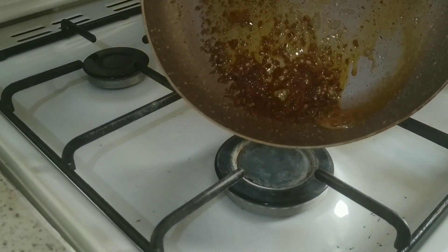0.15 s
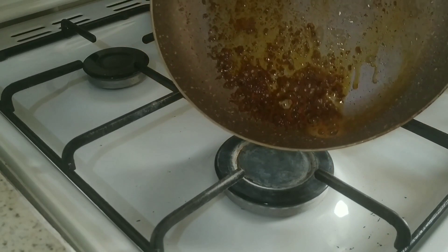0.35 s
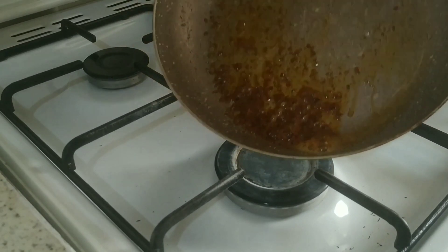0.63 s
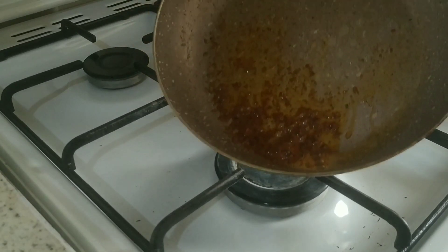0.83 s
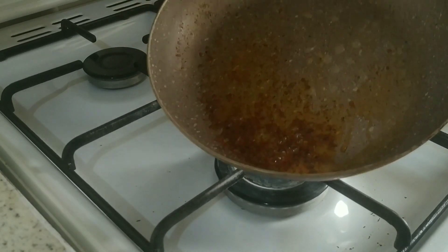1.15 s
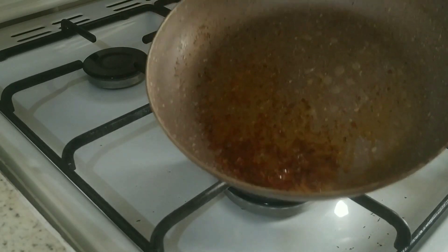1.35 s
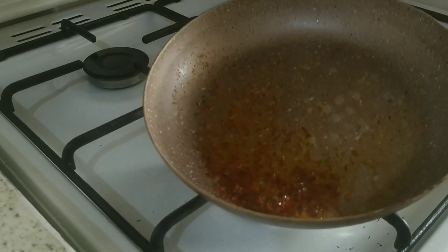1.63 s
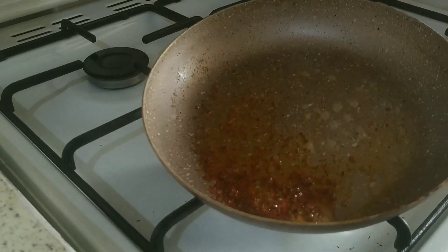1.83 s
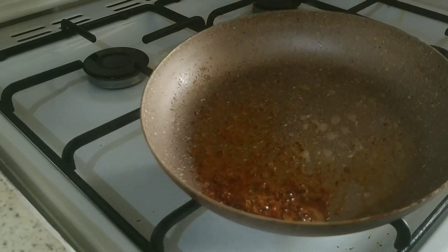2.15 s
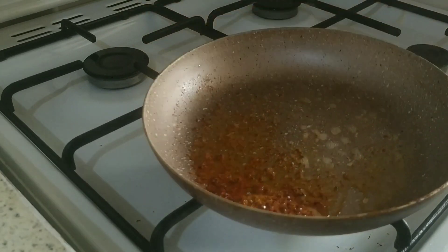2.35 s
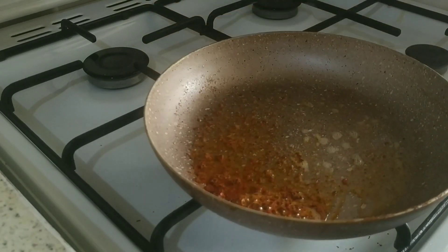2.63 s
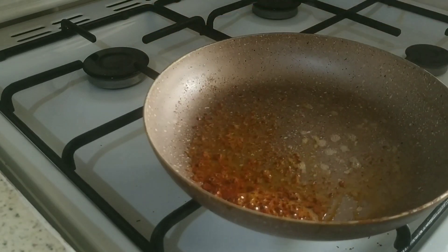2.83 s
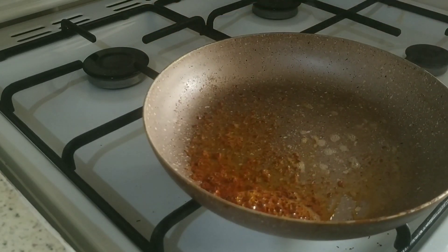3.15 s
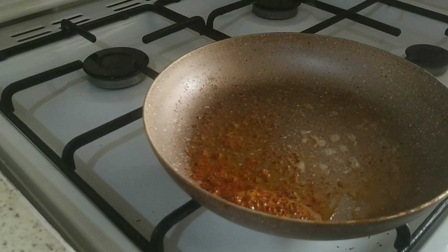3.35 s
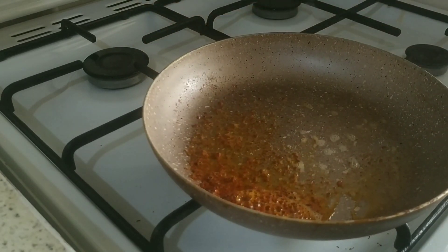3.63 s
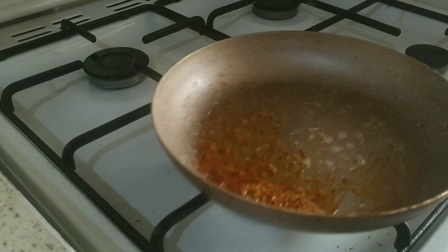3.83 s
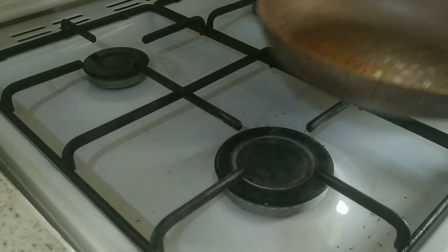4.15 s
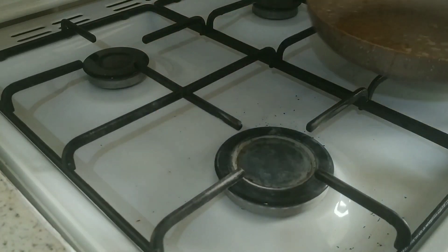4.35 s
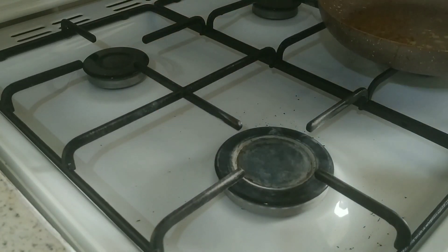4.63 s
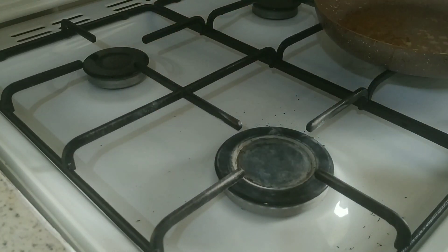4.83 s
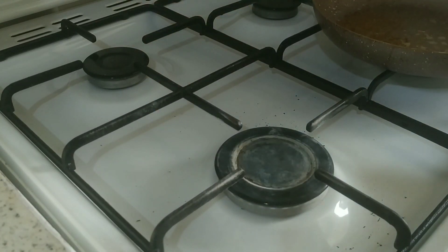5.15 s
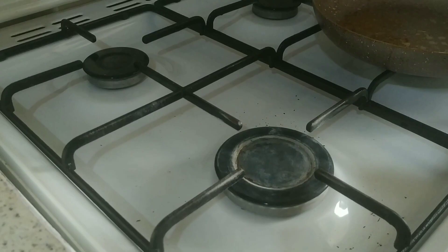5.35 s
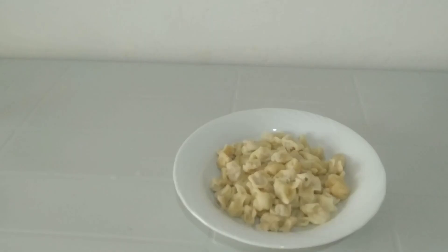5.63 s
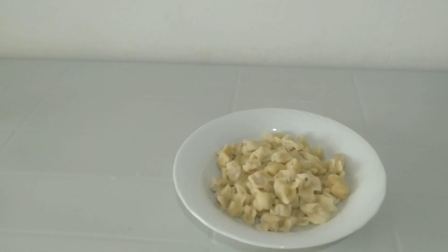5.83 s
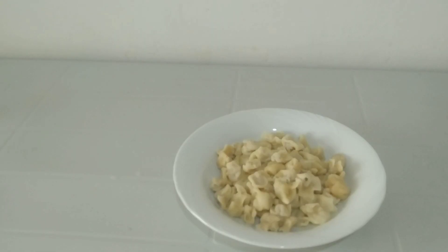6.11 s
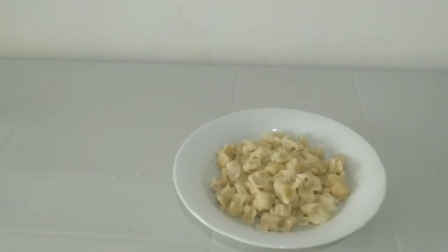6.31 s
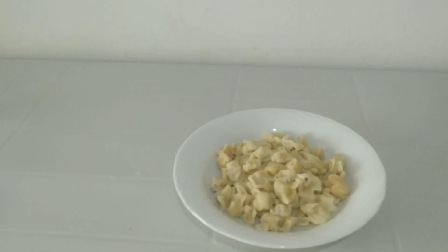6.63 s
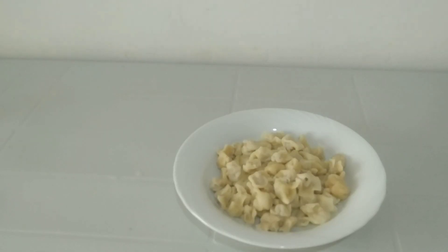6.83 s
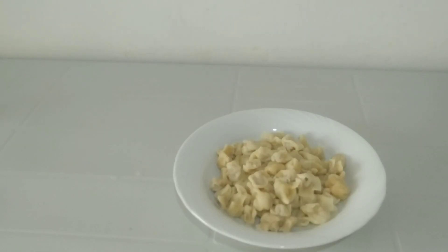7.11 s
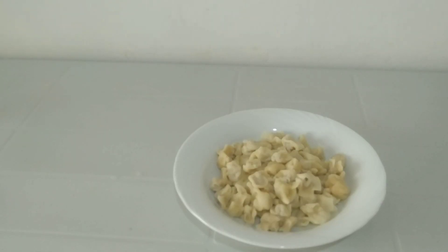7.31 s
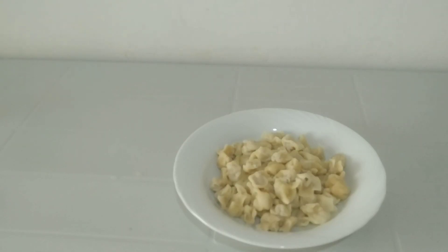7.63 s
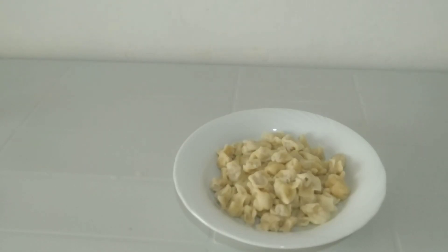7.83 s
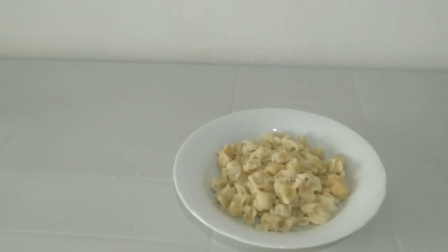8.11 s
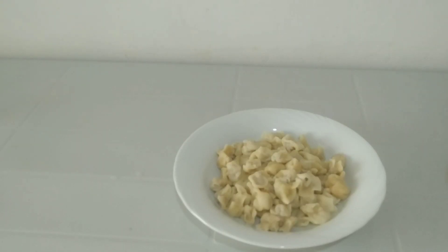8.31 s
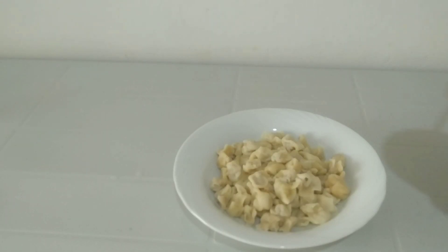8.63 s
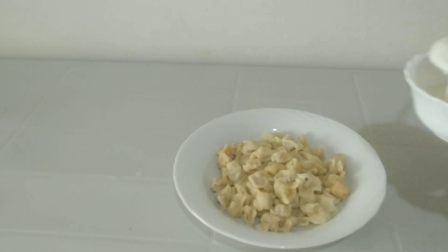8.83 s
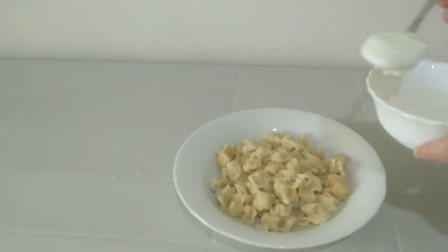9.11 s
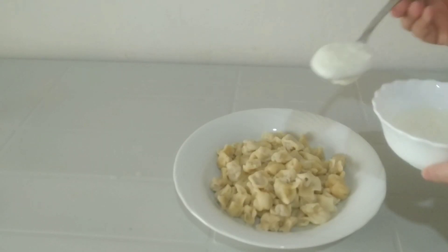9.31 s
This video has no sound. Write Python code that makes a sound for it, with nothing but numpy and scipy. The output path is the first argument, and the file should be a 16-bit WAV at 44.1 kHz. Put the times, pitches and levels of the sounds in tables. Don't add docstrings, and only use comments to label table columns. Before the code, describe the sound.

Close stereo sound of a pan on a stove: quiet high sizzle, tiny crackles, steady hum and rumble, then short metallic knocks with low panel booms and a brief room tail. The sizzle weakens as the pan is moved away. A brief cut leads to a different, soft humming room tone at a table, where a spoon makes several small, bright, quickly dying clinks on a bowl, left of centre.

```python
import sys
import numpy as np
from scipy import signal
from scipy.fft import rfft, irfft
from scipy.io import wavfile
from scipy.ndimage import uniform_filter1d

SR = 44100
rng = np.random.default_rng(int(sys.argv[2]) if len(sys.argv) > 2 else 0)


def wav_out(sig):
    wavfile.write(sys.argv[1], SR, np.round(np.clip(np.atleast_2d(sig).T, -1, 1) * 32767).astype(np.int16))


def gain_from_decibels(decibels):
    exponent = np.asarray(decibels, float) / 20
    return 10 ** exponent


N = 417627
STOVE_END_S, TABLE_START_S = 5.562, 5.594

HUM_HZ = [49.13, 98.26, 100, 156.7, 172.6, 185.1, 191.4, 198.4, 227.3, 294.8, 339.1, 400.7, 465.2, 482.2,
          538.9, 638.8, 3063]
STOVE_HUM_DB = [-60.5, -83.5, -44.5, -85.5, -70, -82, -66.5, -71.5, -67, -77.5, -75.5, -84, -71, -94, -93.5,
                -89, -85]
TABLE_HUM_DB = [-74, -52.5, -50.5, -72, -111, -61, -106, -62.5, -88, -70, -60.5, -70, -99, -68.5, -67,
                -75.5, -79]
# frequency in Hz, density in dB per Hz.
STOVE_AIR = [(12, -21), (30, -15.5), (60, -10), (110, -12), (154, -17.5), (328, -20), (388, -25),
             (472, -26), (590, -26.5), (1480, -36.5), (3630, -40.5), (10500, -42), (14700, -52.5),
             (16000, -66)]
TABLE_AIR = [(12, -42), (30, -7.5), (70, -9.5), (146, -14.5), (255, -14.5), (434, -19), (542, -19),
             (1090, -28), (2000, -33), (3300, -32), (5000, -34.5), (10500, -35.5), (14700, -38.5),
             (16000, -48)]
FIZZ = [(1180, -41), (2000, -12), (3010, -11), (3260, -6), (3770, -2.5), (8480, 2), (14900, -1.5),
        (16000, 1)]
# centre in Hz, width in Hz, level over the rumble in dB.
STOVE_BANDS = [(50, 2.3, 5.5), (65, 2.1, -5), (76, 9, 10), (100, 4.4, 7.5), (119.9, 2.6, 14), (354, 5.8, 3),
               (517, 9.6, 8.5)]
TABLE_BANDS = [(63.5, 10.4, 8.6), (81, 6.1, 3.9), (115, 10, 5.1), (192, 6.5, 0.54), (338.4, 19, 6.9),
               (528, 15, 1.9)]
# frequency in Hz, left-right likeness from -1 to 1.
LIKENESS = [(60, 0.88), (180, 0.86), (550, 0.55), (1650, -0.19), (4970, 0.14), (15000, -0.043)]
# frequency in Hz, t60 in s.
KITCHEN_T60 = [(125, .35), (500, 0.35), (1400, 0.25), (5000, 0.24), (12000, 0.16)]
# start in s, peak level in dB, centre in Hz.
SPITS = [(1.3534, -42, 9030), (1.45, -34, 11200), (2.178, -42, 5010), (2.5022, -42, 9780),
         (2.5214, -32.5, 12000), (3.3988, -42.5, 8960), (5.7868, -45.5, 8100)]
# start in s, level in dB.
THUMPS = [(1.756, -35), (2.775, -28.5), (3.908, -38), (4.764, -33.5), (5.007, -49.5), (5.112, -34.5)]
# frequency in Hz, level in dB, t60 in s.
PANELS = [(80, 1, 0.25), (124, 7.5, 0.35), (179.2, 4, 0.27), (222.1, 0, 0.38), (275.6, -5.5, 0.28),
          (344, -8, 0.49), (425.5, -10, 0.2), (485, -12, 0.29), (520, -12.5, 0.81), (624, -23, 0.063),
          (675, -13.5, 0.08)]
SETTLING = [(538, 1.5, 0.26), (700, -14, .1)]
# start in s, crack at 1.5 kHz in dB, 3.5 kHz relative level in dB, ring relative level
# in dB, contact time in ms.
CLINKS = [
    (7.2408, -43, 13, 23.5, 0.11),
    (7.5386, -34.5, 0, 0, 0.25),
    (7.8374, -51.5, 8, 11, 0.15),
    (8.176, -89, 6, 36, 0.9),
]
# frequency in Hz, level in dB, t60 in s.
BOWL = [(1395, -22.5, 0.23), (2100, -23, 0.048), (3040, -20.5, 0.16), (2530, -26.5, 0.097),
        (3460, -13.5, 0.21), (3480, -13, 0.27), (5530, -16.5, .08), (6214, -7, 0.11), (6210, -2, 0.1),
        (7000, -10, 0.064), (7430, -16, 0.15), (9340, -5.5, 0.039), (12370, -4.5, 0.035),
        (14800, -5, 0.022)]
DAMPED_SPOT = [(3500, -9, 0.25), (4200, -21, 0.049), (4560, -29, 3.2), (4560, -21, 0.32), (5082, -19, 0.17),
               (5970, -3, 0.054), (6360, -35, 0.65), (6600, -51, 5.0), (6900, -28, 0.14),
               (7450, 1.5, 0.034), (8200, -24, 0.096), (8780, -9, 0.096)]
LIGHT_CLINK = [(1470, -8, 0.047), (2330, 1, 0.033), (3590, 0.5, 0.08), (3650, -3, 0.14), (6250, -8, 0.14),
               (6270, -6.5, 0.19), (9590, -14, .05), (12860, -12, .03)]
# start in s, crack at 1.5 kHz in dB, 3.5 kHz relative level in dB, ring relative level
# in dB, contact time in ms.
KNOCKS = [
    (1.748, -36, -27, -8.5, 0.85),
    (2.449, -31.5, -12, -5.5, 1.4),
    (2.7707, -15, -5, -6.5, 0.15),
    (3.782, -43, -10, 12, 2.2),
    (3.9045, -24.5, -6, -3, 0.22),
    (4.7585, -35, -36, 2, 0.61),
    (5.1105, -24.5, -10, -3, 1.4),
    (4.750, -38, -4, 0, 1.1),
    (5.1035, -27.5, 3, -8.5, 0.98),
]
KNOCK_LAGS = [1, -2, 5, -4, -5, -4, -3, -4, -3]
# frequency in Hz, level in dB, t60 in s.
BELLY = [(542, -5.5, 0.91), (750, -5, 0.23), (862, -3, 0.48), (1056, -4, 0.11), (1260, -12, 0.24),
         (1530, -2.5, 0.1), (1860, -4, 0.1), (2060, -6, 0.12), (2550, -6.5, 0.045), (4520, -18, 0.076)]
EDGE = [(800, -3, 0.091), (783, -3, 0.17), (1020, -7, 0.054), (1350, -10.5, 0.17), (1553, -11, 0.14),
        (2180, -7.5, 0.088), (2570, -10.5, 0.071), (2957, -10.5, 0.15), (3220, -16.5, 0.11),
        (4000, -17, .1)]
FLAT = [(534, -31, 1), (600, -14, 0.05), (640, -10.5, 0.13), (780, -18, 0.13), (793, 2.5, 0.088),
        (880, 6, 0.12), (1100, 0.5, 0.12), (1190, 6, 0.044), (1363, 10, 0.044), (1430, -15, .08),
        (2197, 2, 0.085), (2460, -9.5, 0.3), (3180, 5.5, 0.07), (3300, -15, 0.18)]
PRONG = [(1140, 5, 0.028), (1280, -29, 0.1), (1900, -37.5, 0.28), (2100, -21, 0.044)]
TILT = [(553, -15, 0.17), (770, -3.5, 0.037), (918, 1, 0.03), (1022, -6, 0.1), (1154, 0, 0.038),
        (1390, -7.5, 0.055), (1650, -11, 0.051), (2060, -17, 0.19), (2900, -25, 0.11), (3370, -23, 0.063),
        (3650, -25, 0.073), (4550, -11, 0.038)]
BACK_TILT = [(516, -8, 0.1), (690, -11, .15), (794, 0, .1), (877, -1.5, 0.099), (1190, -17, .15),
             (1383, -2, 0.14), (2060, -9.5, 0.19), (2440, -22, 0.22), (2993, -6.5, 0.11),
             (4560, -16, 0.068)]
BACK_FLAT = [(440, -9.5, 0.14), (548, -13, 0.26), (666, -5, 0.1), (780, -1.5, 0.21), (967, -6, 0.16),
             (1066, -12, 0.19), (1185, -8.5, 0.24), (1383, 2, 0.18), (1554, -17.5, 0.34),
             (2084, -10.5, 0.31), (2590, -14, 0.22), (2960, -6.5, 0.22), (3710, -20, 0.072),
             (4540, -9.5, 0.11)]


def evened(x):
    return x / np.sqrt(np.mean(x ** 2) + 1e-20)


def read(points, hz):
    f, value = np.transpose(points)
    return np.interp(np.log(hz + 1), np.log(f + 1), value)


def add(mix, s, sound):
    part = mix[round(s * SR):][:len(sound)]
    part += sound[:len(part)]


def second_microphone(first, other, likeness):
    return np.array([first, likeness * first + np.sqrt(1 - likeness ** 2) * other])


def hum(levels_db, right_db):
    beat_peak_s = 6.347
    t = np.arange(N) / SR - beat_peak_s
    lines = np.zeros(N)
    for k, (hz, db) in enumerate(zip(HUM_HZ, levels_db)):
        start, sway_hz, sway_start = rng.random(3) * (k > 2)
        sway = 1 + 0.48 * np.sin(2 * np.pi * (2.5 * sway_hz * t + sway_start))
        lines += np.sqrt(2) * gain_from_decibels(db) * sway * np.cos(2 * np.pi * (hz * t + start))
    return lines * gain_from_decibels(np.array([[-right_db], [right_db]]))


def air(spectrum, bands, patchy_db, size):
    hop = size // 4
    hz = np.fft.rfftfreq(size, 1 / SR)
    a, b, c, d, patches = rng.standard_normal((N // hop + 5, len(hz), 5)).T
    patches = uniform_filter1d(patches, size=9, axis=0)
    patches = evened(uniform_filter1d(patches, size=6, axis=1))
    likeness = np.clip(read(LIKENESS, hz), -1, 1)[:, None]
    z = second_microphone(a + 1j * b, c + 1j * d, likeness)
    shape_db = read(spectrum, hz)
    for centre_hz, width_hz, db in bands:
        shape_db = shape_db + db * np.exp(-((hz - centre_hz) / width_hz) ** 2)
    z *= gain_from_decibels(shape_db[:, None] + patchy_db * patches)
    return evened(signal.istft(z, nperseg=size, noverlap=size - hop)[1][:, :N])


def stove_background():
    lines = hum(STOVE_HUM_DB, right_db=0.62)
    return lines + gain_from_decibels(-50.5) * air(STOVE_AIR, STOVE_BANDS, patchy_db=2.77, size=8192)


def table_background(t):
    wake_db, awake_db, wake_s = -20.5, -5.5, 0.098
    lines = hum(TABLE_HUM_DB, right_db=0.0)
    rumble = gain_from_decibels(-49.5) * air(TABLE_AIR, TABLE_BANDS, patchy_db=3.0, size=8192)
    gain_db = awake_db + (wake_db - awake_db) * np.exp(-abs(t - TABLE_START_S) / wake_s)
    return gain_from_decibels(gain_db) * (lines + rumble)


def kitchen(x, gap_ms):
    taps = np.zeros((2, SR // 2))
    at = np.arange(0, SR // 2 - 20, 20)
    at = at + rng.integers(0, 20, (2, len(at)))
    np.put_along_axis(taps, at, rng.choice([-1., 1.], at.shape), 1)
    hz, t, z = signal.stft(taps, SR, nperseg=256)
    likeness = np.clip(read(LIKENESS, hz), 0, 1)[:, None]
    z = second_microphone(z[0], z[1], likeness)
    fall = gain_from_decibels(-60 * t / read(KITCHEN_T60, hz)[:, None])
    tail = signal.istft(z * fall, SR, nperseg=256)[1]
    tail *= np.minimum(np.arange(tail.shape[1]) * 1000 / (SR * gap_ms), 1)
    return signal.fftconvolve(x[None], tail / np.linalg.norm(tail[0]), axes=1)[:, :N]


def oil_fizz(t):
    hot_db, cool_db, cool_s = -59, -66, 1.26
    away_s, away_db, away_db_per_s = 4.4, -4.5, 1.5
    level_db = cool_db + (hot_db - cool_db) * np.exp(-t / cool_s)
    level_db += (t > away_s) * (away_db + away_db_per_s * (t - away_s))
    return gain_from_decibels(level_db + 3.0) * air(FIZZ, [], patchy_db=2.0, size=512)


def oil_spits():
    spits = np.zeros(N)
    t = np.arange(SR // 50) / SR
    for s, db, hz in SPITS:
        band = signal.butter(2, [0.72 * hz, min(2.0 * hz, 16000)], "bandpass", fs=SR, output="sos")
        puff = evened(signal.sosfilt(band, rng.standard_normal(len(t))))
        add(spits, s, gain_from_decibels(db) * puff * np.exp(-t * 1000 / 1.4))
    return spits


def ring(modes, contact_ms, damping=1.0, cycles=0.37):
    split, twin_db = 0.027, -7.5
    t = np.arange(SR // 2) / SR
    hz, db, t60 = np.transpose(modes)[:, :, None]
    swell = (1 - np.exp(-t / (contact_ms / 1000 + cycles / hz))) ** 2
    fall_db = 60 * t * damping / np.clip(t60, .02, .9)
    off, start = rng.random((len(hz), 2, 2)).T[..., None]
    upper = np.sin(2 * np.pi * (hz * (1 + split * off[0]) * t + start[0]))
    lower = np.sin(2 * np.pi * (hz * (1 - split * off[1]) * t + start[1]))
    tones = np.sin(2 * np.pi * hz * t) + gain_from_decibels(twin_db - 0.25 * fall_db) * (upper + lower)
    return (swell * gain_from_decibels(db - db.max() - fall_db) * tones).sum(0)


def hit(db, mid_db, high_db, ring_db, contact_ms, modes, crack_ms, low_hz, damping):
    t = np.arange(SR // 2) / SR
    top_db = high_db - 13.0 + 0.93 * min(high_db - mid_db, 0)
    colour = [(0.47 * low_hz, -30), (low_hz, -3), (1500, 0), (3500, mid_db),
              (6500, 0.89 * mid_db + 0.17 * high_db), (10500, high_db), (15500, top_db)]
    shape = gain_from_decibels(read(colour, np.fft.rfftfreq(len(t), 1 / SR)))
    noise = evened(irfft(rfft(rng.standard_normal(len(t))) * shape))
    noise *= gain_from_decibels(max(0, mid_db, high_db))
    rise = (1 - np.exp(-t * 1000 / contact_ms)) ** 2
    crack = noise * rise * np.exp(-t * 1000 / (crack_ms + contact_ms))
    return gain_from_decibels(db) * (crack + gain_from_decibels(ring_db) * ring(modes, contact_ms, damping))


def stove_top():
    boom = np.zeros(N)
    for s, db in THUMPS:
        add(boom, s, gain_from_decibels(db) * ring(PANELS, contact_ms=3.7, cycles=2.0))
    add(boom, 5.003, gain_from_decibels(-44.5) * ring(SETTLING, contact_ms=2.5))
    return boom


def bowl_clinks():
    bowl = np.zeros(N)
    for (s, db, mid_db, ring_db, ms), modes in zip(CLINKS, [BOWL, DAMPED_SPOT, LIGHT_CLINK, LIGHT_CLINK]):
        high_db = mid_db - 0.5
        add(bowl, s, hit(db, mid_db, high_db, ring_db, ms, modes, crack_ms=5.1, low_hz=1322, damping=2.66))
    return bowl


def bowl_at_left(bowl):
    direct = np.array([gain_from_decibels(2.5) * np.roll(bowl, shift=-21), gain_from_decibels(-7.0) * bowl])
    return direct + gain_from_decibels(np.array([[-2.5], [-6.5]])) * kitchen(bowl, gap_ms=4.2)


def pan_knocks():
    sharp_db, dull_db, dull_ms = 16.5, -12.5, 0.27
    direct, to_room = np.zeros((2, 2, N))
    struck = [BELLY, EDGE, FLAT, PRONG, TILT, BACK_TILT, BACK_FLAT, BACK_TILT, BACK_FLAT]
    for k, ((s, db, mid_db, ring_db, ms), modes, lag) in enumerate(zip(KNOCKS, struck, KNOCK_LAGS)):
        high_db = mid_db + dull_db + (sharp_db - dull_db) * np.exp(-ms / dull_ms)
        blow = hit(db, mid_db, high_db, ring_db, ms, modes, crack_ms=2.67, low_hz=630, damping=1.68)
        add(to_room[k % 2], s, blow)
        add(direct[0], s + lag / SR, gain_from_decibels(1.2) * blow)
        add(direct[1], s, gain_from_decibels(5.0) * blow)
    return direct, to_room


def scene():
    t = np.arange(N) / SR
    knocks, to_room = pan_knocks()
    boom = stove_top()
    bowl = bowl_clinks()
    spits = oil_spits()
    room = kitchen(to_room[0] + gain_from_decibels(-3.0) * spits, gap_ms=0.82) + kitchen(to_room[1], gap_ms=3.)
    clinks = bowl_at_left(bowl)
    stove = oil_fizz(t) + stove_background()
    stove *= np.clip((STOVE_END_S - t) / 0.0019, 0, 1)
    table = table_background(t) * (t > TABLE_START_S)
    return stove + table + gain_from_decibels(-3.5) * spits + boom + clinks + knocks + gain_from_decibels(2) * room


def microphone_drift():
    swing, swing_at_s, period_s, spread_s = .02, 6.2, .75, .36
    creep, creep_s = .007, .25
    t = np.arange(N) / SR
    late = t - swing_at_s
    awake = np.maximum(t - TABLE_START_S, 0) / creep_s
    left = swing * np.sin(2 * np.pi * late / period_s) * np.exp(-(late / spread_s) ** 2) * (awake > 0)
    right = creep * awake * np.exp(1 - awake)
    return np.array([left, right])


def top_cut(x):
    return signal.sosfilt(signal.butter(12, 16530, fs=SR, output="sos"), x)


def record(dry):
    low_pass = signal.firwin(255, 15600, window=("kaiser", 7), fs=SR)
    mix = signal.oaconvolve(dry, low_pass[None], "same") + microphone_drift()
    return top_cut(mix)


dry = scene()
out = record(dry)
wav_out(out)
```